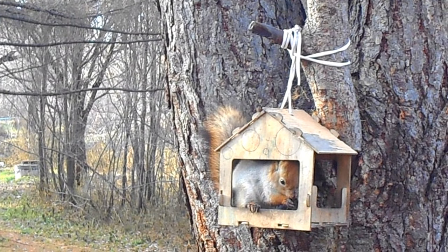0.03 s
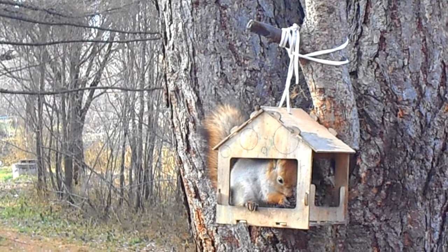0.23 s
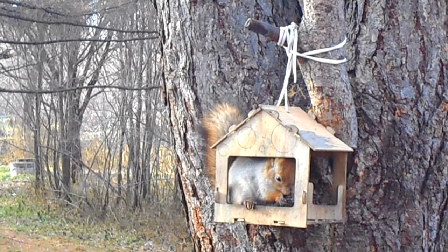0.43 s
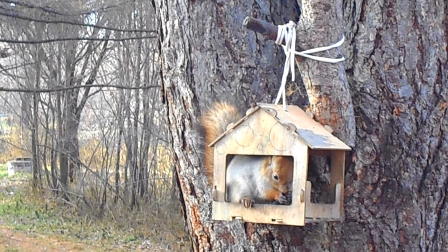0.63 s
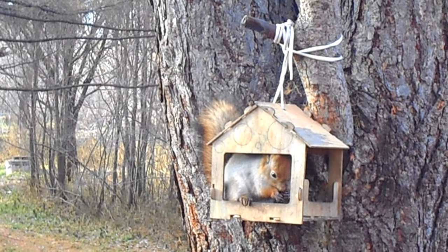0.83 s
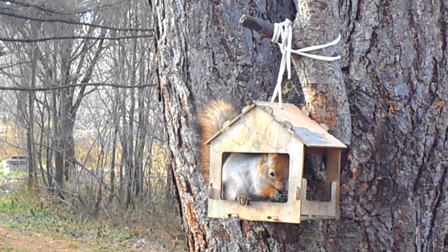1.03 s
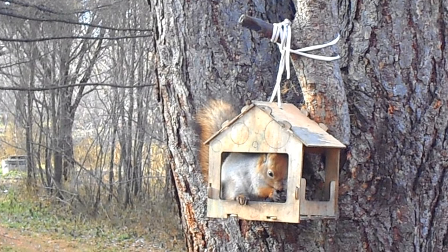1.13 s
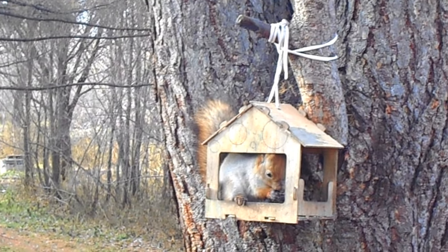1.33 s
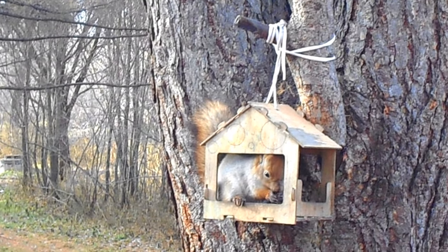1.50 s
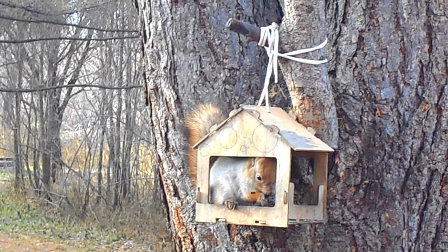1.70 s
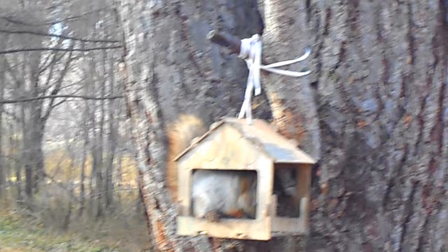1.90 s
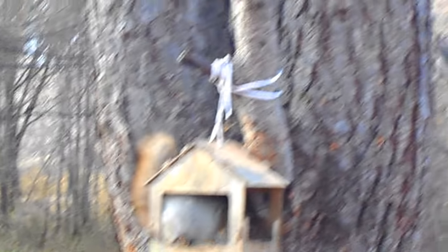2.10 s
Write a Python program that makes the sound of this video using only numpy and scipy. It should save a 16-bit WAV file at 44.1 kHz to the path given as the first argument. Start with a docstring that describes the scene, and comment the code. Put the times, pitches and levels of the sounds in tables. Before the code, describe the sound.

Two very short, shrill wavering bird chirps come early and close, just after a small burst of seed cracking; then faint tooth ticks and tiny far-off peeps over a steady distant traffic drone, outdoors among trees, dull-topped camera microphone.

```python
"""Among trees: distant traffic drones and dry leaves stir far off, both as shaped noise, for just over two seconds.
From the start a squirrel in a plywood feeder cracks seed husks and nibbles: short noise bursts, grainy hiss.
Near 0.22 s and 0.32 s a small bird on a tree gives two wavering whistles, gliding near sines, the second
edged by clicks; the trunk throws back an echo and the wood rings on, a convolution with decaying noise.
Faint tooth ticks follow from 0.48 s, and a far bird pipes short wavering notes from 0.64 s to 1.76 s."""
import sys
import numpy as np
from scipy import signal
from scipy.fft import rfft, irfft
from scipy.io import wavfile
from scipy.ndimage import uniform_filter1d

SR = 44100
rng = np.random.default_rng(int(sys.argv[2]) if len(sys.argv) > 2 else 0)


def gain_from_db(level_db):
    """Convert decibel levels to linear amplitude factors (20 dB per decade)."""
    decades = np.asarray(level_db, float) / 20
    return 10 ** decades


def transcribe(signal):
    """Save signal, clipped to [-1, 1], as a 16-bit WAV file at the path in sys.argv[1]."""
    frames = np.atleast_2d(signal).T
    limited = np.clip(frames, -1, 1)
    pcm = np.round(limited * 32767).astype(np.int16)
    wavfile.write(sys.argv[1], SR, pcm)


N = 94815


def walk(rate):
    """Smooth random drift of spread near 1, drawn about rate times a second."""
    k = max(int(SR / rate), 1)
    steps = np.repeat(rng.standard_normal(N // k + 1), k)
    return 1.2 * uniform_filter1d(uniform_filter1d(steps, k), k)[:N]


def band(x, lo_hz, hi_hz, order=2):
    """Butterworth band-pass."""
    sos = signal.butter(order, [lo_hz, min(hi_hz, .45 * SR)], "band", fs=SR, output="sos")
    return signal.sosfilt(sos, x)


def curve(table, x):
    """Straight lines between the rows of a two-column table."""
    return np.interp(x, *np.array(table).T)


# distant road, tone colour of the drone: f/Hz, relative level/dB per Hz
TRAFFIC_SPECTRUM = [(12, -54.5), (20, -34.5), (58, -18), (108, -21), (164, -19.5), (207, -19), (428, -11),
                    (885, -2.5), (956, -2), (1150, -5.5), (1780, -15), (2190, -20.5), (2920, -27.5),
                    (6360, -37.5), (9890, -49), (10700, -52.5), (12900, -82.5), (21800, -120)]
TRAFFIC_DB = -48  # rms of the drone
SWELL_DB, FLICKER_DB = .25, .5  # spread of the common swell and of each octave's own flicker
HUM_HZ, HUM_DB = 156, -76  # middle pitch and rms level


def traffic():
    """Smooth distant drone in octave bands that swell together and flicker alone, and a wavering hum."""
    f = np.maximum(np.arange(N // 2 + 1) * SR / N, 1)
    hz, db = np.array(TRAFFIC_SPECTRUM).T
    spectrum = rfft(rng.standard_normal(N)) * gain_from_db(np.interp(np.log(f), np.log(hz), db))
    drone, swell = 0, walk(1.2)
    for octave in range(4, 15):  # centred on 2 ** octave Hz
        share = np.clip(1 - np.abs(np.log2(f) - octave), 0, 1)
        drone = drone + irfft(spectrum * share, N) * gain_from_db(SWELL_DB * swell + FLICKER_DB * walk(9.2))
    hum_level = gain_from_db(HUM_DB + 1.1 * walk(4.4))
    hum_hz = HUM_HZ * (1 + 0.0061 * walk(3.6))
    hum = hum_level * np.sin(2 * np.pi * np.cumsum(hum_hz) / SR)
    return drone * gain_from_db(TRAFFIC_DB) / np.std(drone) + np.sqrt(2) * hum


# dry leaves stirring far off: t/s, level/dB
LEAF_STIR = [(0, -70.5), (.07, -71), (.13, -74.5), (.58, -89.5), (0.619, -68.5), (0.689, -81.5),
             (0.749, -90.5), (1.001, -83.5), (1.04, -69.5), (1.09, -73.5), (1.18, -71), (1.27, -73.5),
             (1.401, -75.5), (1.55, -70), (1.801, -74), (2.15, -73.5)]
LEAVES_LO_HZ, LEAVES_HI_HZ, LEAVES_FLICKER_DB = 3000, 5370, 2.5


def leaves():
    """A soft patchy rustle in the lower treble: band-passed noise under a moving level."""
    rustle = band(rng.standard_normal(N), LEAVES_LO_HZ, LEAVES_HI_HZ)
    db = curve(LEAF_STIR, np.arange(N) / SR) + LEAVES_FLICKER_DB * walk(75)
    return gain_from_db(db) * rustle / np.std(rustle)


# seed husks cracking, and the clicks that start and end the second whistle:
# t/s, peak level/dB, centre f/Hz, decay length/s
CRACKS_AND_CLICKS = [(.026, -52.5, 7805, 0.002066), (.0476, -44.5, 5142, 0.001178),
                     (.0505, -53, 7465, 0.002468), (.0545, -50, 8131, 0.0017), (.0548, -46, 3476, 0.001882),
                     (.0655, -59.5, 7007, 0.001724), (.066, -53, 3728, 0.0019),
                     (.0703, -39.5, 6100, 0.0017), (.0725, -37.5, 5500, 0.0015),
                     (.0748, -49.5, 6511, .0015), (.0945, -43, 6477, .0015), (.0962, -45.5, 8017, 0.0012),
                     (.0955, -42.5, 2911, .003), (.1032, -41, 5502, 0.00071), (.117, -64.5, 7220, 0.0022),
                     (.1395, -50.5, 6504, 0.001), (.2635, -46, 5248, .001), (.288, -54.5, 3589, 0.0033),
                     (.2965, -47, 3310, 0.003), (.302, -45.5, 3350, .002), (.3203, -46.5, 5100, .0004),
                     (.3622, -44.5, 3650, 0.0013), (1.109, -55.5, 9000, 0.0015),
                     (1.133, -53.5, 9137, 0.002323), (1.435, -56.5, 8700, 0.002908),
                     (1.49, -62.5, 8346, 0.004071), (1.60, -58.5, 8500, 0.003916),
                     (1.645, -58, 7517, 0.0044), (1.69, -65.5, 7918, 0.003416),
                     (1.737, -63, 7960, 0.002943), (1.858, -54, 5544, 0.003753), (1.939, -65, 6000, 0.0024),
                     (2.110, -55.5, 8470, 0.001708), (2.127, -52.5, 6397, 0.00668)]
# dry tooth clicks in the feeder: t/s, peak level/dB
TOOTH_TICKS = [(.4778, -54), (.4802, -47), (.5806, -47), (.688, -53), (.7875, -54), (.8755, -51),
               (1.0295, -49), (1.30, -55)]
TOOTH_HZ, TOOTH_S = 8500, .0002  # centre and decay of a tooth click
RUSTLE_PER_S, RUSTLE_DB, RUSTLE_SPREAD_DB = 60, -70, 2  # lowest peak; random part above it
CRACKLE = 1.2  # power that turns hiss into separate snaps
CRACK_WIDTH = .4  # band reaches from centre / 1.4 to centre * 1.4
KNOCK_DB, KNOCK_HZ = -8, 3800  # filter gain and centre of the duller knock


def squirrel_and_clicks():
    """Each sound is a short crack around its own centre plus a duller knock; tiny random ones rustle between."""
    out, t = np.zeros(N + SR), np.arange(1500) / SR
    draws = rng.random((int(RUSTLE_PER_S * N / SR), 3))
    rustle = [(when * N / SR, RUSTLE_DB - RUSTLE_SPREAD_DB * np.log(force), 4000 + 5000 * pitch, .002)
              for when, force, pitch in draws]
    ticks = [(s, db, TOOTH_HZ, TOOTH_S) for s, db in TOOTH_TICKS]
    rows = CRACKS_AND_CLICKS + ticks + rustle
    for (s, db, hz, length), noise in zip(rows, rng.standard_normal((len(rows), len(t)))):
        snaps = noise * np.abs(noise) ** CRACKLE
        burst = snaps * np.exp(-t / length) * np.minimum(4 * t / length, 1)
        if length == TOOTH_S:
            burst[2] += 3  # a tooth click is one clean blow
        crack = band(burst, hz / (1 + CRACK_WIDTH), hz * (1 + CRACK_WIDTH))
        knock = band(burst, KNOCK_HZ / 2, KNOCK_HZ * 2, order=1)
        both = crack + gain_from_db(KNOCK_DB) * knock
        i = int(s * SR)
        out[i:i + len(t)] += gain_from_db(db) * both / np.abs(both).max()
    return out[:N]


# near reflections from trunk and feeder: delay t/s, level/dB before the band-pass
TRUNK_ECHOES = [(.0048, -18), (.0068, -16.5)]
ECHO_BLUR_S = .0006  # rough bark spreads each echo
SCATTER_DB, SCATTER_S = -16, .009  # scatter from the bark and how long it lasts
WOOD_DB, WOOD_T60_S, WOOD_ONSET_S = -26, 0.14, .004
LATE_DB, LATE_T60_S = -27, .4
BARK_TOP_HZ = 9000  # bark and leaves swallow the highest treble


def ring_tail(t, db, t60):
    """Exponential decay, 60 dB in t60 seconds, scaled to the same energy for any t60."""
    return gain_from_db(db - 60 * t / t60) * np.sqrt(2 * np.log(1000) / t60 / SR)


def trees():
    """Impulse response: single echoes, close scatter and the two-stage ring of the wood."""
    t = np.arange(int(.6 * SR)) / SR
    decay = ring_tail(t, WOOD_DB, WOOD_T60_S) + ring_tail(t, LATE_DB, LATE_T60_S)
    ring = decay * (1 - np.exp(-t / WOOD_ONSET_S))
    scatter = gain_from_db(SCATTER_DB) * np.exp(-(t / SCATTER_S) ** 4) / np.sqrt(SCATTER_S * SR)
    response = rng.standard_normal(len(t)) * (ring + scatter)
    for s, db in TRUNK_ECHOES:
        blur = np.exp(-((t - s) / ECHO_BLUR_S) ** 2) * rng.standard_normal(len(t))
        response = response + gain_from_db(db) * blur / np.sqrt(np.sum(blur ** 2))
        response[int(s * SR)] += gain_from_db(db)  # the sharp part of the echo
    return band(response, 300, BARK_TOP_HZ, order=1)


# dense fine nibbling in the feeder: start t/s, end t/s, level/dB
NIBBLE_STRETCHES = [(1.2, 1.3, -90), (.045, .108, -76.5), (1.42, 1.7693, -80.5)]
NIBBLE_LO_HZ, NIBBLE_HI_HZ, NIBBLE_GRAIN_DB = 6000, 10517, 3


def nibble():
    """Stretches of high band-passed hiss with a quick random flutter of level that makes it grainy."""
    t = np.arange(N) / SR
    hiss = band(rng.standard_normal(N), NIBBLE_LO_HZ, NIBBLE_HI_HZ)
    gate = 0
    for start, end, db in NIBBLE_STRETCHES:
        gate = gate + gain_from_db(db) * np.clip(np.minimum(t - start, end - t) / 0.018, 0, 1)  # 18 ms fades
    return gain_from_db(NIBBLE_GRAIN_DB * walk(110)) * gate * hiss / np.std(hiss)


# near bird, pitch of each whistle: t/s, f/Hz
WHISTLE_PITCH = [
    [(.222, 7400), (.224, 7290), (.226, 7450), (.228, 7980), (.231, 9420), (.2335, 9850), (.236, 9480),
     (.239, 8740), (.2425, 8320), (.245, 8480), (.248, 9560), (.25, 9880), (.252, 9380), (.255, 7870),
     (.258, 7210), (.261, 7380), (.263, 7690), (.266, 7830), (.268, 8200), (.270, 9000), (.2727, 9740),
     (.275, 9200), (.277, 8000), (.2815, 4350)],
    [(.3205, 7400), (.323, 7390), (.325, 7660), (.327, 7890), (.329, 8500), (.331, 9330), (.333, 9700),
     (.335, 9320), (.338, 8600), (.341, 8230), (.345, 8140), (.348, 8210), (.350, 8620), (.352, 9200),
     (.354, 9500), (.356, 9080), (.358, 7950), (.361, 5620), (.3622, 5050)],
]
# near bird, effort of each whistle: t/s, level/dB before the throat's gain
WHISTLE_EFFORT = [
    [(.222, -42), (.224, -34.5), (.227, -26.5), (.233, -27.5), (.243, -19.5), (.25, -23), (.258, -21),
     (.265, -19), (.27, -22.5), (.278, -24), (.282, -19)],
    [(.3205, -41.5), (.322, -30.5), (.327, -20), (.333, -27), (.341, -23), (.348, -20), (.354, -25.5),
     (.359, -27.5), (.363, -30)],
]
# resonance of the throat: f/Hz, gain level/dB
THROAT_GAIN = [(4000, -13), (5400, -11), (6300, -4.5), (7400, 1), (8300, -2.5), (9000, -9.5), (9800, -4)]
# the half tone swells and breaks off: t/s, gain level/dB
HALF_TONE_SWELL = [(.224, -10), (.228, 4), (.236, 3), (.244, -2), (.25, 3), (.257, -1), (.26, -18),
                   (.264, -18), (.267, 0), (.274, 2), (.279, -6), (.323, -14), (.328, 1), (.332, 2),
                   (.335, -8), (.339, 0), (.35, -2), (.355, -3), (.359, -12)]
ATTACK_S, RELEASE_S, GLIDE_S = .0006, .0006, .0015  # GLIDE_S smooths the pitch
HALF_DB, HALF_FLUTTER_DB = -39, 2.5  # half tone against the effort, before its swell
HALF_JITTER_RAD = .5  # its phase wanders
BREATH_DB, FLUTTER_DB = -32, .6


def bird():
    """A near sine that glides, loudest where the throat resonates, with a faint half-pitch tone and a little air."""
    t, out = np.arange(N) / SR, 0
    flutter = gain_from_db(FLUTTER_DB * walk(900))
    half = gain_from_db(HALF_DB + HALF_FLUTTER_DB * walk(300) + curve(HALF_TONE_SWELL, t))
    air = gain_from_db(BREATH_DB) * walk(2500)
    drift = HALF_JITTER_RAD * walk(700)
    for pitch, effort in zip(WHISTLE_PITCH, WHISTLE_EFFORT):
        start, end = pitch[0][0], pitch[-1][0]
        hz = uniform_filter1d(curve(pitch, t), int(GLIDE_S * SR))
        phase = 2 * np.pi * np.cumsum(hz) / SR
        gate = np.clip(np.minimum((t - start) / ATTACK_S, (end - t) / RELEASE_S), 0, 1)
        whistle = gain_from_db(curve(THROAT_GAIN, hz)) * flutter * (1 + air) * np.sin(phase)
        half_tone = half * np.sin(phase / 2 + drift)
        out = out + np.sqrt(2) * gain_from_db(curve(effort, t)) * gate * (whistle + half_tone)
    return out


# far bird piping: start t/s, length/s, f/Hz, level/dB
FAR_NOTES = [(.635, .045, 4120, -70), (1.02, .035, 4120, -70), (1.478, .024, 4240, -68),
             (1.503, .04, 4250, -64.5), (1.704, .024, 4150, -66), (1.726, .034, 4250, -67)]
FAR_RISE_PER_S = .3  # share of pitch gained per second of a note, beneath the random wobble


def far_bird():
    """Short chirps with rounded ends, blurred by distance: the pitch and level of each waver at random."""
    t, out = np.arange(N) / SR, 0
    wobble = .008 * walk(170)
    blur = gain_from_db(2.2 * walk(150))
    for s, length, hz, db in FAR_NOTES:
        swell = np.sin(np.pi * np.clip((t - s) / length, 0, 1))
        rise = FAR_RISE_PER_S * np.clip(t - s - length / 2, -length, length)
        phase = 2 * np.pi * np.cumsum(hz * (1 + wobble + rise)) / SR
        out = out + gain_from_db(db) * swell * blur * np.sin(phase)
    return out


def scene():
    """Birds, squirrel and clicks sound direct and off the trees; traffic and leaves come without reflections."""
    song = bird() + far_bird()
    gnaw = squirrel_and_clicks() + nibble()
    wet = signal.fftconvolve(song + .6 * gnaw, trees())[:N]  # gnawing and clicks excite the trees less
    return (song + gnaw + wet + traffic() + leaves())[None]


def top_cut(x):
    """Nothing passes above the cut-off."""
    return signal.sosfilt(signal.butter(12, 10600, fs=SR, output="sos"), x)


def record(dry):
    """The camera's microphone channel cuts the top steeply and adds a little hiss."""
    top_hz, stop_db, hiss_db = 10900, 36, -104
    cut = signal.sosfilt(signal.cheby2(8, stop_db, top_hz, fs=SR, output="sos"), dry)
    mix = cut + gain_from_db(hiss_db) * rng.standard_normal(dry.shape)
    return top_cut(mix)


dry = scene()
out = record(dry)
transcribe(out)
```